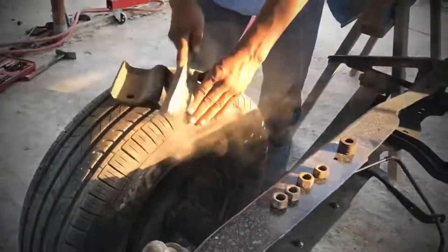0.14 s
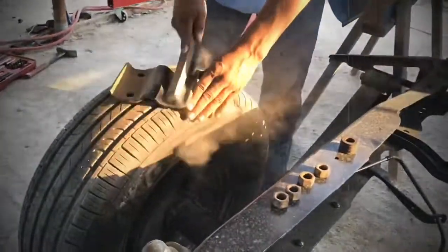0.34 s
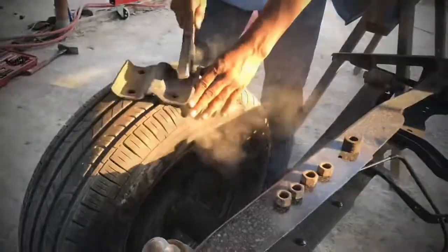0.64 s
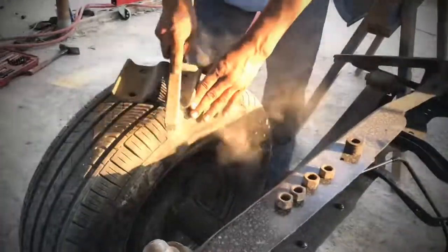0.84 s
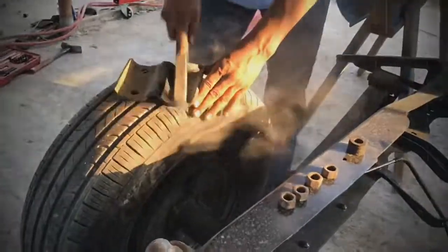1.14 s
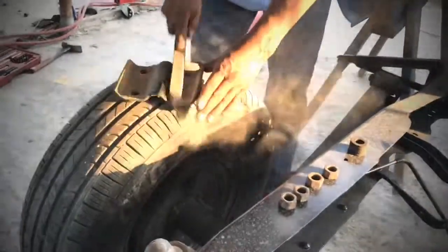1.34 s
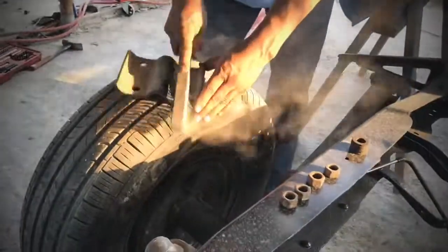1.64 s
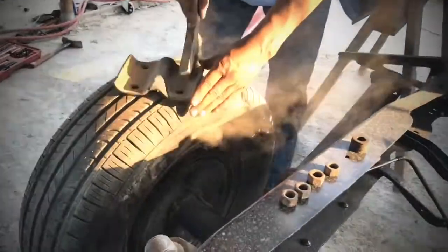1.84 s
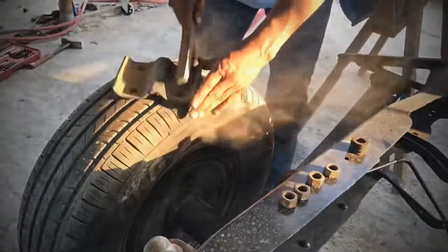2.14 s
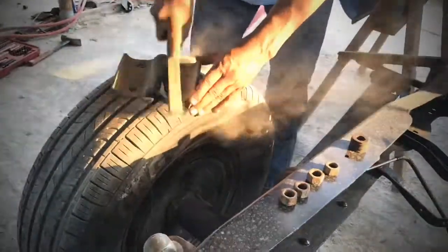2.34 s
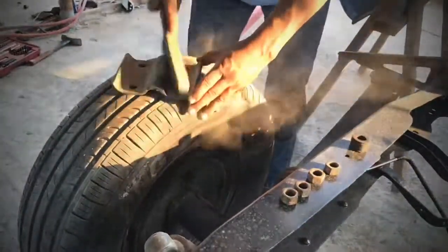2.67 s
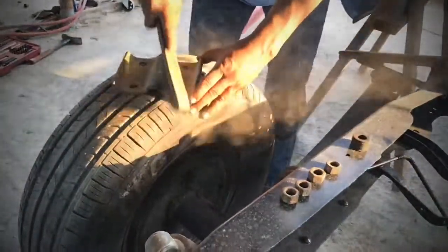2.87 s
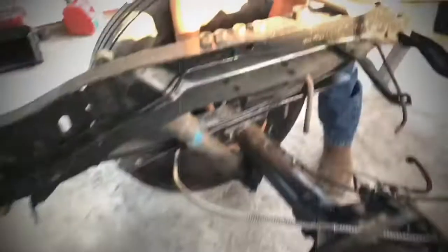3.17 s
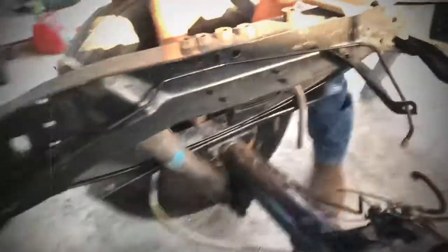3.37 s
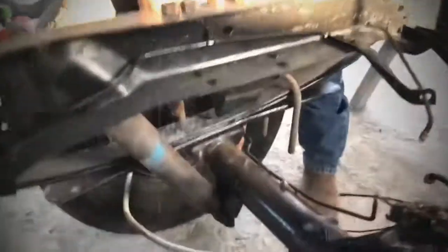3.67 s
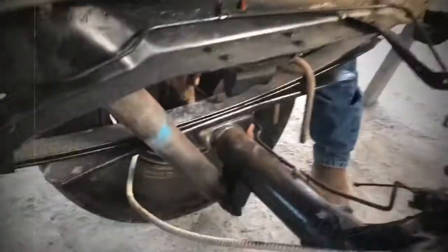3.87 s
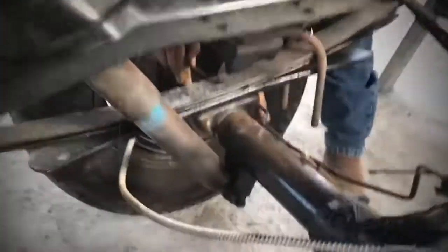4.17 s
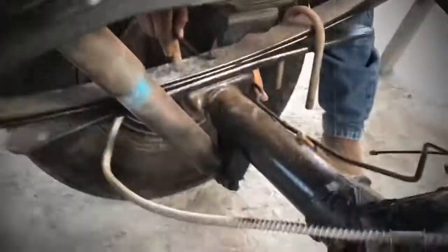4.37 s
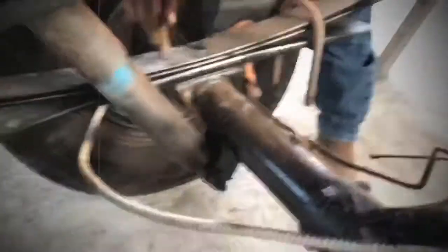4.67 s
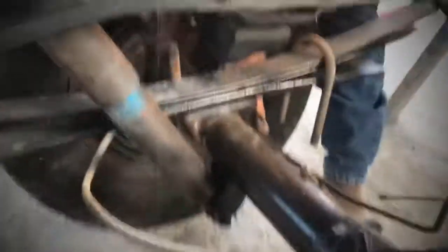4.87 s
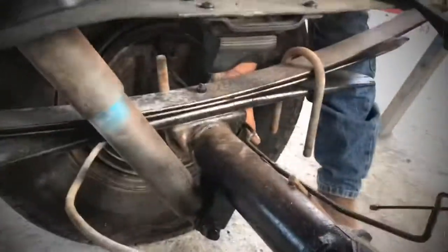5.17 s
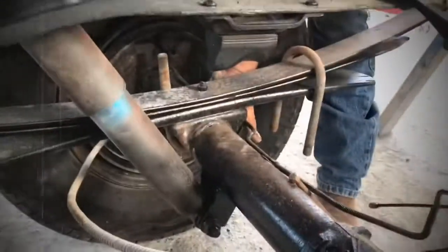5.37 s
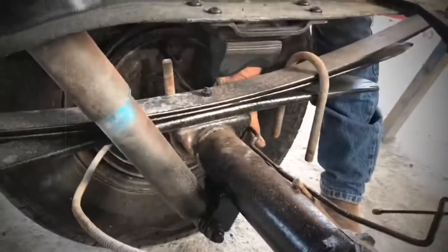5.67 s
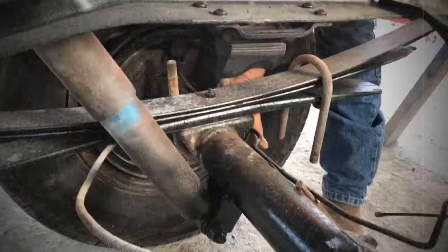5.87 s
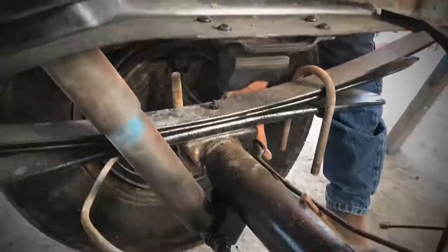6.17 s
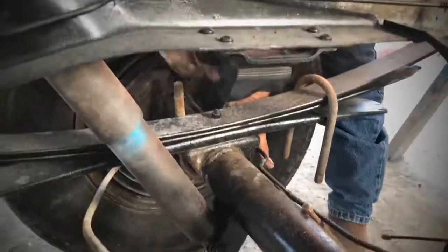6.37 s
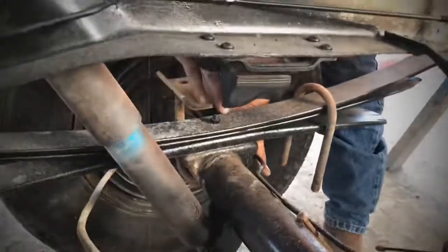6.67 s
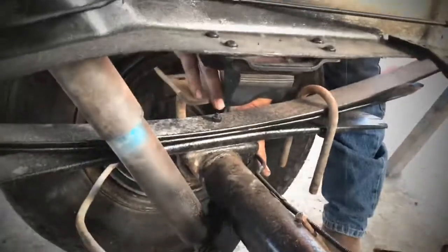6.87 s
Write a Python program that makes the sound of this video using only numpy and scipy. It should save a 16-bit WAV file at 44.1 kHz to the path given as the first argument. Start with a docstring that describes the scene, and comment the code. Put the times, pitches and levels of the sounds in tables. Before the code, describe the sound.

Fast, bright wire-brush strokes on a steel plate cut off abruptly, followed by hissing air, dull steel knocks, and a plate clinking into place.

```python
"""A hand wire brush scrubs a rusty steel spring plate lying on a tyre: filtered noise, shaped stroke by stroke,
drives faint plate resonances, and decaying modes with noise slaps make the plate's bumps on the rubber.
After a brief silence the scene is under a truck, in steady coloured-noise hiss: parts knock on the leaf spring
(noise bursts and struck modes), fingers tap the microphone, then the plate slides in and clinks onto its bolt.
Hands and clothes rustle and the room hums in both places; one handheld microphone in a garage."""
import sys
import numpy as np
from scipy import signal
from scipy.fft import rfft, irfft, next_fast_len
from scipy.io import wavfile
from scipy.ndimage import uniform_filter1d, map_coordinates

SR = 44100
rng = np.random.default_rng(int(sys.argv[2]) if len(sys.argv) > 2 else 0)


def put_to_file(sound):
    """Save the sound as 16-bit audio at rate SR, in the file named by the first command-line argument."""
    columns = np.atleast_2d(sound).T  # one column per channel
    safe = np.clip(columns, -1, 1)
    whole_steps = np.round(safe * 32767)
    wavfile.write(sys.argv[1], SR, whole_steps.astype(np.int16))


N = 309141

# Brush strokes, push and pull in turn, each lasting until the next: start t/s, level/dB, favoured mode f/Hz
STROKES = [(-0.13, -34.5, 3170), (0.055, -38, 3230), (0.254, -35.5, 5771), (0.453, -37.5, 6567),
           (0.636, -35.5, 8400), (0.838, -39.5, 8153), (1.028, -34.5, 7065), (1.238, -39.5, 3060),
           (1.425, -35, 8100), (1.634, -40, 8290), (1.818, -36, 8153), (2.02, -37.5, 8300),
           (2.196, -33.5, 13193), (2.388, -38, 3675), (2.576, -33.5, 10861), (2.816, -37.5, 13900),
           (2.992, -35.5, 6033)]
# Scrape spectrum of the wires: f/Hz, density/dB per Hz
BRISTLE_SPECTRUM = [(410, -29.5), (700, -26.5), (919, -21), (1020, -20.5), (1490, -7.5), (2140, -12.5),
                    (2370, -7), (2920, -9.5), (3120, -6), (5520, -6.5), (6790, 0.5), (8470, -2),
                    (10000, -8), (12800, -3), (15600, -7)]
# Modes of the steel plate: f/Hz
PLATE_HZ = [924, 1440, 1645, 2398, 2849, 3125, 3157, 3233, 3675, 4130, 4600, 5771, 6033, 6567, 7065, 7699,
            8153, 8195, 8359, 10861, 11300, 13193, 14010]
# The same modes, row for row: brushed level/dB, struck level/dB, t60/s
PLATE_MODES = [(-13.5, -4, 0.41), (-13.5, -13, 0.056), (-28, 3, 0.049), (-10.5, -6, 0.23),
               (-20, -8.5, 0.53), (-3.5, -13, 0.086), (-28, -3, 0.12), (-43, -6.5, 0.23), (-4.5, -8, 0.047),
               (-15, -17, 0.11), (-9, -18, 0.12), (-5, -19.5, 0.38), (-2, -30, 0.08), (-2, -19.5, 0.17),
               (0, -27, 0.1), (-5.5, -23, 0.063), (0.5, -32, 0.31), (-6.5, -36, 0.21), (-4.5, -36, 0.14),
               (-14, -42, 0.58), (-5, -42, 0.11), (-4.5, -42, 0.092), (-14, -54, .12)]
# Plate bumps the tyre: t/s, level/dB
BUMPS = [(.205, -36.5), (.3, -55), (0.512, -37), (0.581, -57), (1.209, -45), (1.59, -48.5), (1.703, -38.5),
         (2.141, -47), (2.276, -45.5), (2.439, -48.5)]
# Tyre modes: f/Hz, level/dB, t60/s
TYRE_MODES = [(92.6, 3, 0.14), (146.7, -10, 0.54), (183, -7, 0.25)]
# Slap of plate on rubber: f/Hz, density/dB per Hz
SLAP_SPECTRUM = [(60, -29), (150, 7), (300, -4.5), (480, 2.0), (650, -8.0), (900, -27), (2500, -47)]
# Knocks on the leaf spring: t/s, level/dB, brightness/dB per octave, ring level/dB, favoured mode f/Hz
KNOCKS = [(3.119, -46.5, 1, -22, 700), (3.513, -42, 0.5, -10.5, 385), (3.533, -33, 2, -9.5, 260),
          (3.855, -52.5, -1.5, -5, 327), (4.22, -41, 0.5, -7.5, 2430), (4.281, -48.5, -3, 1.5, 327),
          (5.006, -66, -7, -21, 235), (5.361, -46, -3.5, -11.5, 235), (6.585, -44.5, -0.5, -8, 260),
          (6.727, -53, 2, -10, 327), (6.765, -43, 0, -12, 260), (6.914, -47.5, -2, -14, 235)]
# Leaf spring modes: f/Hz, level/dB, t60/s
SPRING_MODES = [(234.7, -1.5, 0.45), (257.8, -7, 0.86), (324, -6.5, 0.98), (383, 1.5, 0.15),
                (469, -14, 0.42), (627, -4, 0.18), (680, -14, 0.4), (826, -17, 0.14), (990, -11, 0.27),
                (1010, -15.5, 0.28), (1290, -32, .15), (1660, 4.5, 0.036), (2470, -3, 0.093)]
# Crack and clunk of a blow, also the click of a finger tap: f/Hz, density/dB per Hz
CLUNK_SPECTRUM = [(50, -35), (130, -6), (350, 7), (650, 0), (1000, 4.5), (1700, -7), (2500, -8),
                  (4200, -14), (7000, -35), (14000, -44)]
# Modes of the axle beneath: f/Hz, level/dB, t60/s
AXLE_MODES = [(112, 0, 0.1), (153, -4.5, 0.12), (228, -17, 0.039)]
# Chassis boom after each knock: f/Hz, density/dB per Hz
BOOM_SPECTRUM = [(100, -36), (190, -1.5), (255, 2.5), (390, -3), (520, -20), (1000, -50)]
# Rubbing steel: middle t/s, half length/s, centre f/Hz, width/Hz, level/dB
SQUEAKS = [(3.207, 0.37, 1020, 22.3, -65.5), (3.8, 0.016, 4130, 150, -55.5),
           (4.276, 0.04, 3950, 130, -55.5)]
# Plate dragging over steel: f/Hz, density/dB per Hz
DRAG_SPECTRUM = [(290, -8), (500, -6), (953, -3.5), (1130, -6), (1460, 2.5), (2020, -5), (5000, -14),
                 (6500, -37), (11000, -120)]
# Plate edge catches: t/s, level/dB
CATCHES = [(6.254, -40.5), (6.331, -44), (6.388, -45), (6.398, -39.5), (6.451, -40)]
# Plate on bolt: t/s, level/dB, ring level/dB, favoured mode f/Hz, its boost/dB
CLINKS = [(6.530, -32, -6, 924, 5), (6.536, -40, 1.5, 3157, 16.5), (6.566, -31, 1, 924, 2)]
# Noise of plate meeting bolt: f/Hz, density/dB per Hz
CLASH_SPECTRUM = [(100, -16), (500, -13), (950, -9), (1300, 5), (1650, 0.5), (2000, -15), (2400, 1),
                  (3200, -26), (4500, -14), (5200, -40), (7000, -26), (14000, -39)]
# Finger taps on the microphone housing: t/s, level/dB
TAPS = [(3.241, -56.5), (3.301, -54), (3.362, -51), (3.406, -52), (3.446, -52), (4.598, -40), (4.62, -27.5),
        (4.627, -40), (4.657, -37.5)]
# Housing modes: f/Hz, level/dB, t60/s
HOUSING_MODES = [(110, -23, 0.087), (250, 2, 0.024), (358, -5, 0.027), (613, 1.5, 0.012), (930, -9, 0.014),
                 (1350, -16, 0.013)]
# Rustle of hands and clothes: t/s, level/dB
RUSTLE_LEVEL = [(0, -55.5), (3.07, -56), (3.7, -53.5), (4.1, -57), (4.5, -55), (6.1, -61.5), (7, -55)]
# Rustle spectrum: f/Hz, density/dB per Hz
CLOTH_SPECTRUM = [(60, -9), (150, 4.5), (330, -1.5), (600, -7.5), (1000, -8), (1800, -11.5), (4000, -7)]
# Hiss spectrum: f/Hz, density/dB per Hz
HISS_SPECTRUM = [(290, -55), (500, -25), (770, -19), (1240, -28), (1410, -20), (1490, -32), (2300, -17),
                 (2580, -20), (3590, -14), (6300, -3), (7270, -7), (8520, 0), (10700, -5), (12000, -1),
                 (15600, -12)]
# Hiss: t/s, level/dB
HISS_LEVEL = [(3.15, -53.5), (4, -52), (5, -50), (6, -50), (7, -51)]
# Hiss reflected off the chassis: t/s, lag/s
ECHO_LAG = [(3.1, 0.00076), (3.9, 0.00066), (4.4, 0.00059), (4.8, 0.000499), (7, 0.00052)]
# Room hum spectrum: f/Hz, density/dB per Hz
ROOM_SPECTRUM = [(15, -51), (25, -26), (40, -5.5), (59, -0.5), (117, -4.5), (145, -25), (313, -20),
                 (413, -28), (600, -36), (780, -74), (1320, -120)]
# Garage reverberation: f/Hz, t60/s
GARAGE_T60 = [(100, 0.47), (400, 0.34), (1500, 0.24), (5000, 0.11), (14000, 0.075)]

PAUSE_START_S, PAUSE_END_S = 3.073, 3.121
LAST_STROKE_S = 0.15
# a push swells late, a pull bites early: lateness of the peak, narrowness, ring level/dB, low rasp/dB
PUSH, PULL = (1.16, 1.33, -1.4, 1.45), (0.76, 1.01, 0.95, 1.87)
RING_FADE_DB_PER_S = 4  # the holding hand damps the plate more and more
HARD_BUMP_DB, SLAP_DB, SLAP_GROWTH_DB_PER_DB = -40, -9, 0.99  # slap relative to its bump; SLAP_DB at a hard bump
THUD_DB, THUD_DB_PER_TILT = -17.5, 5.3  # axle thud; gain for each dB per octave of dullness
BOOM_DB, BOOM_RISE_S = -12.5, 0.028
FAVOUR_DB = 6.5  # extra drive to a knock's favoured mode
SLIDE_START_S, SLIDE_STOP_S, SLIDE_EDGE_S = 6.24, 6.47, 0.023  # edge: attack and release
SLIDE_DB, SLIDE_GROWTH_DB_PER_S = -58, 27  # level at the start, growth
# taps at FIRM_TAP_DB or louder have the full tilt; softer ones are duller
FIRM_TAP_DB, FIRM_TILT_DB_PER_OCT, DULLING_DB_PER_OCT_PER_DB = -42, 1.5, 1.37
HUM_AT_TYRE_DB, HUM_UNDER_TRUCK_DB = -60.5, -64
TOP_HZ = 15750


def amp(db):
    """Decibels to gain."""
    return 10 ** (np.asarray(db) / 20)


def unit(x):
    """Scale to rms 1."""
    return x / np.sqrt(np.mean(x ** 2) + 1e-20)


def clock(size):
    """Seconds at each sample."""
    return np.arange(size) / SR


def along(points, hz):
    """Interpolate (Hz, value) points on a log axis."""
    f, v = np.transpose(points)
    return np.interp(np.log(hz + 1), np.log(f + 1), v)


def curve(rows):
    """(s, value) rows as one value per sample."""
    return np.interp(clock(N), *np.transpose(rows))


def wobble(knots_per_s):
    """A smooth random curve through normally distributed knots."""
    return map_coordinates(rng.standard_normal(N // 16), [clock(N) * knots_per_s], mode="wrap")


def filtered(x, response):
    """Multiply the spectrum of x by a function of frequency."""
    m = next_fast_len(len(x) + SR // 4)
    return irfft(rfft(x, m) * response(np.fft.rfftfreq(m, 1 / SR)), m)[:len(x)]


def noise(spectrum, size, tilt_db_per_oct=0):
    """Coloured noise of rms 1."""
    def response(hz):
        return amp(along(spectrum, hz) + tilt_db_per_oct * np.log2(hz / 100 + 1))
    return unit(filtered(rng.standard_normal(size), response))


def burst(spectrum, t60_s, tilt_db_per_oct=0):
    """The dense, quickly dying part of a blow."""
    return noise(spectrum, SR, tilt_db_per_oct) * amp(-60 * clock(SR) / t60_s)


def ring(modes, scatter_db):
    """Struck modes decay exponentially, each with random sign and slightly random strength."""
    t = clock(SR)
    out = np.zeros(SR)
    for hz, db, t60_s in modes:
        envelope = amp(db + scatter_db * rng.normal() - 60 * t / t60_s)
        out += rng.choice([-1, 1]) * envelope * np.sin(2 * np.pi * hz * t)
    return out


def favour(hz, favoured_hz, boost_db):
    """The point of contact drives the modes near one frequency harder (dB per mode)."""
    hz = np.array(hz)
    nearest_hz = hz[np.argmin(np.abs(hz - favoured_hz))]
    return boost_db * np.exp(-(np.log(hz / nearest_hz) / 0.02) ** 2)


def add(track, s, sound):
    """Mix a sound in at time s."""
    part = track[round(s * SR):][:len(sound)]
    part += sound[:len(part)]


def brush(grain_db=1.0, chatter_db=1.0, turn_db=-12, scrape_db=-0.67, sing_db=-11, skip_db=2,
          rasp_hz=4800, flex_s=0.004, boost_db=7, mode_wander_db=2.0):
    """Wire tips catch and flick with a force shaped by each stroke; friction keeps the plate's modes singing."""
    t, force = clock(N), np.zeros(N)
    starts, stroke_db, favoured_hz = np.transpose(STROKES)
    ends = np.append(starts[1:], starts[-1] + LAST_STROKE_S)
    styles = [(PUSH, PULL)[k % 2] for k in range(len(STROKES))]
    lateness, narrowness, ring_db, rasp_db = np.transpose(styles)
    for start, end, db, late, narrow in zip(starts, ends, stroke_db, lateness, narrowness):
        travel = np.clip((t - start) / (end - start), 0, 1)
        force += amp(db) * np.abs(np.sin(np.pi * travel ** late)) ** narrow

    def at_stroke(values):
        return np.interp(t, (starts + ends) / 2, values)

    force = uniform_filter1d(force, int(flex_s * SR) + 1)  # springy wires round off each turn
    turn_floor = amp(at_stroke(stroke_db) + turn_db)
    force = np.hypot(force, turn_floor) * amp(chatter_db * wobble(70))

    wires = mottled(noise(BRISTLE_SPECTRUM, N), depth_db=2.7)
    grit = unit(wires * amp(grain_db * wobble(1400)))
    rasp = filtered(grit, lambda hz: 1 / (1 + (hz / rasp_hz) ** 4))
    scrape = force * (grit + (amp(at_stroke(rasp_db)) - 1) * rasp)

    grip = force * amp(skip_db * wobble(12.91))
    ring_db = ring_db - RING_FADE_DB_PER_S * (starts - starts.mean())
    boosts = np.transpose([favour(PLATE_HZ, hz, boost_db) for hz in favoured_hz])
    sing = np.zeros(N)
    for hz, (db, _, t60_s), boost in zip(PLATE_HZ, PLATE_MODES, boosts):
        wander = mode_wander_db * rng.standard_normal(len(starts))
        drive = grip * rng.standard_normal(N) * at_stroke(amp(ring_db + boost + wander))
        # two-pole resonator, scaled for its bandwidth
        pole, angle = amp(-60 / (t60_s * SR)), 2 * np.pi * hz / SR
        mode = signal.lfilter([1, 0, -1], [1, -2 * pole * np.cos(angle), pole ** 2], drive)
        sing += amp(db) * np.sqrt((1 - pole) / 2) * mode
    return amp(scrape_db) * scrape + amp(sing_db) * sing


def mottled(x, depth_db):
    """Brief narrow resonances come and go, as different wires bite."""
    z = signal.stft(x, nperseg=1024)[2]
    field = uniform_filter1d(rng.standard_normal(z.shape), size=4, axis=0)
    field = uniform_filter1d(field, size=6, axis=1)
    return signal.istft(z * amp(depth_db * unit(field)), nperseg=1024)[1][:N]


def tyre():
    """The rocking plate thumps the tyre's air and rubber: ringing modes and a slap."""
    out = np.zeros(N)
    for s, db in BUMPS:
        slap_db = SLAP_DB + SLAP_GROWTH_DB_PER_DB * (db - HARD_BUMP_DB)
        slap = amp(slap_db) * burst(SLAP_SPECTRUM, t60_s=0.096)
        add(out, s, amp(db - 1) * (ring(TYRE_MODES, scatter_db=1.5) + slap))
    return out


def knocks():
    """Steel parts land on the leaf spring: a crack, a clunk, ringing modes, an axle thud and a swelling boom."""
    out = np.zeros(N)
    hz, mode_db, t60_s = np.transpose(SPRING_MODES)
    age = clock(SR) / BOOM_RISE_S
    for s, db, tilt, ring_db, favoured_hz in KNOCKS:
        struck_db = mode_db + tilt * np.log2(hz / 400) + favour(hz, favoured_hz, FAVOUR_DB)
        ringing = amp(ring_db + 1) * ring(zip(hz, struck_db, t60_s), scatter_db=0.5)
        thud = amp(THUD_DB - THUD_DB_PER_TILT * tilt) * ring(AXLE_MODES, scatter_db=0.5)
        crack = amp(-11) * burst(CLUNK_SPECTRUM, t60_s=0.051, tilt_db_per_oct=tilt + 0.6)
        clunk = amp(-0.5) * burst(CLUNK_SPECTRUM, t60_s=0.14, tilt_db_per_oct=tilt - 0.7)
        boom = amp(BOOM_DB) * noise(BOOM_SPECTRUM, SR) * age * np.exp(1 - age)
        add(out, s, amp(db) * (crack + clunk + ringing + thud + boom))
    return out


def squeaks():
    """Steel rubbing on steel sings faintly in a narrow band."""
    out = np.zeros(N)
    for s, half_s, centre_hz, width_hz, db in SQUEAKS:
        band = filtered(rng.standard_normal(N), lambda hz: np.exp(-((hz - centre_hz) / width_hz) ** 2))
        envelope = np.sqrt(np.clip(1 - ((clock(N) - s) / half_s) ** 2, 0, 1))
        out += amp(db) * unit(band) * envelope
    return out


def plate():
    """The plate drags grittily into place, drops on the bolt and bounces; each contact excites its modes."""
    t = clock(N)
    edge_distance_s = np.minimum(t - SLIDE_START_S, SLIDE_STOP_S - t)
    contact = np.clip(edge_distance_s / SLIDE_EDGE_S + 0.5, 0, 1)
    grit = unit(noise(DRAG_SPECTRUM, N) * amp(2.5 * wobble(220)))
    out = grit * contact * amp(SLIDE_DB + SLIDE_GROWTH_DB_PER_S * (t - SLIDE_START_S))
    for s, db in CATCHES:
        add(out, s, amp(db) * burst(DRAG_SPECTRUM, t60_s=0.013, tilt_db_per_oct=3.2))
    _, struck_db, t60_s = np.transpose(PLATE_MODES)
    ends = [row[0] for row in CLINKS[1:]] + [N / SR]
    for (s, db, ring_db, favoured_hz, boost_db), end in zip(CLINKS, ends):
        free = np.clip((end - s - clock(SR)) / 0.0043 + 1, 0, 1)  # the next contact stops this ring
        modes = zip(PLATE_HZ, struck_db + favour(PLATE_HZ, favoured_hz, boost_db), t60_s)
        ringing = amp(ring_db) * free * ring(modes, scatter_db=1.0)
        add(out, s, amp(db) * (burst(CLASH_SPECTRUM, t60_s=0.088) + ringing))
    return out


def handling():
    """Dry finger taps excite the housing's modes, over a soft noise rustle of hands and clothes."""
    out = noise(CLOTH_SPECTRUM, N) * amp(curve(RUSTLE_LEVEL) + 1.8 * wobble(18))
    hz, mode_db, t60_s = np.transpose(HOUSING_MODES)
    for s, db in TAPS:
        tilt = FIRM_TILT_DB_PER_OCT - DULLING_DB_PER_OCT_PER_DB * max(FIRM_TAP_DB - db, 0)
        modes = zip(hz, mode_db + tilt * np.log2(hz / 400), t60_s)
        click = amp(-16.0 + 1.7 * tilt) * burst(CLUNK_SPECTRUM, t60_s=0.018, tilt_db_per_oct=12.0)
        add(out, s, amp(db) * (ring(modes, scatter_db=1.5) + click))
    return out


def background(echo_share=0.14):
    """Low room hum, and a hiss like leaking air; its echo's lag, and so its colour, shifts as the mic moves."""
    t, air = clock(N), noise(HISS_SPECTRUM, N)
    echo = map_coordinates(air, [(t - curve(ECHO_LAG)) * SR])
    hiss = unit(air + echo_share * echo) * amp(curve(HISS_LEVEL)) * (t > PAUSE_END_S)
    hum_db = np.where(t < PAUSE_END_S, HUM_AT_TYRE_DB, HUM_UNDER_TRUCK_DB)
    return hiss + noise(ROOM_SPECTRUM, N) * amp(hum_db)


def garage(x):
    """The room's tail, decaying noise after 5 ms; treble dies first."""
    hz, t, z = signal.stft(rng.standard_normal(SR // 2), SR, nperseg=256)
    decay = amp(-60 * t / along(GARAGE_T60, hz)[:, None])
    tail = signal.istft(z * decay, SR, nperseg=256)[1]
    return signal.fftconvolve(x, np.pad(tail / np.linalg.norm(tail), (SR // 200, 0)))[:N]


def scene():
    """Brushing at the tyre, a brief silence, then fitting under the truck; both channels alike."""
    scrub, bumps, parts, clinks = brush(), tyre(), knocks() + squeaks(), plate()
    at_tyre = scrub + bumps + garage(amp(-16) * scrub + amp(-10.0) * bumps)
    under_truck = parts + clinks + garage(amp(-9) * parts + amp(-11.5) * clinks)
    around = handling() + background()
    before = (at_tyre + around) * (clock(N) < PAUSE_START_S)
    after = (under_truck + around) * (clock(N) > PAUSE_END_S)
    mono = before + after
    return np.array([mono, mono])


def record(dry, low_cut_hz=40):
    """The microphone loses deep bass and the very top."""
    high_pass = signal.butter(2, low_cut_hz, "high", fs=SR, output="sos")
    passed = signal.sosfilt(high_pass, dry)
    return np.array([filtered(side, lambda hz: hz < TOP_HZ) for side in passed])


dry = scene()
out = record(dry)
put_to_file(out)
```